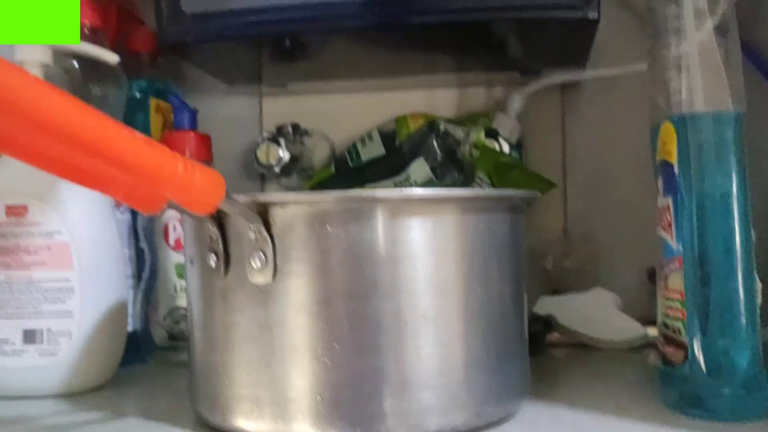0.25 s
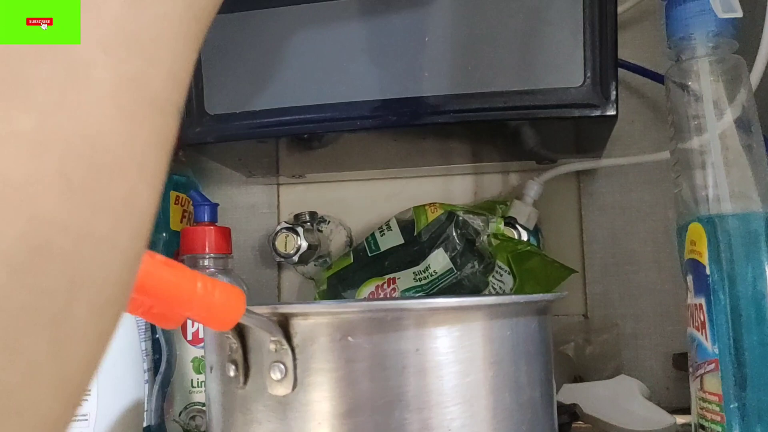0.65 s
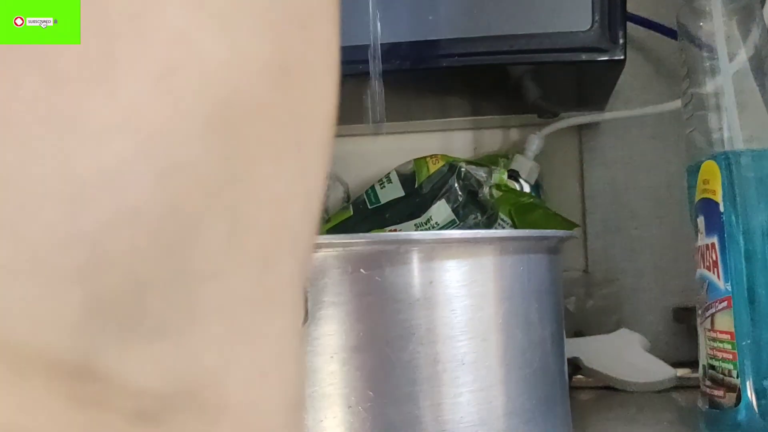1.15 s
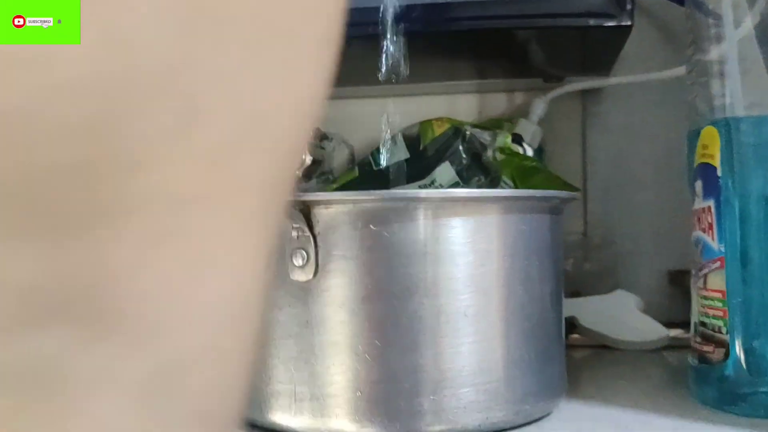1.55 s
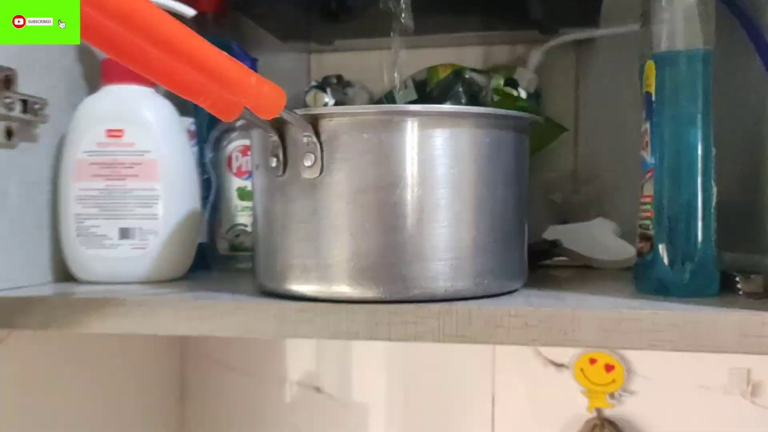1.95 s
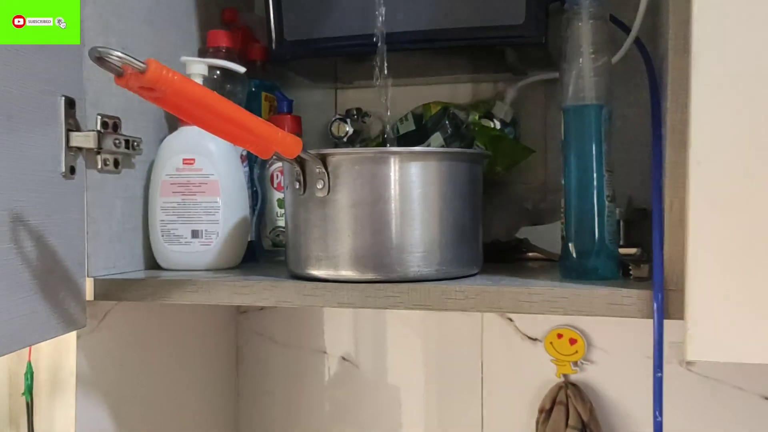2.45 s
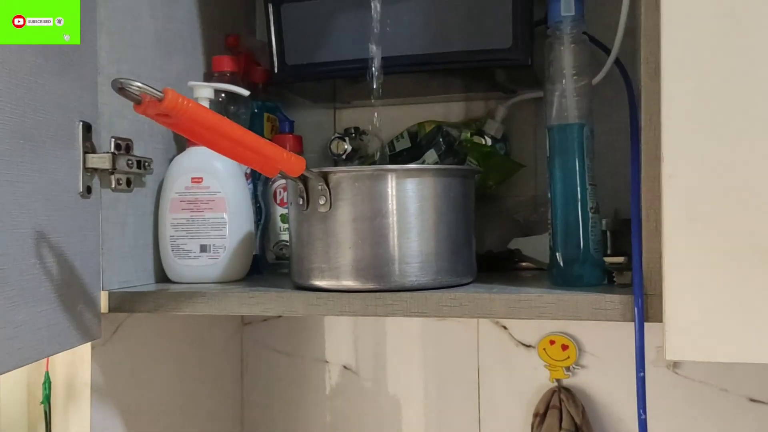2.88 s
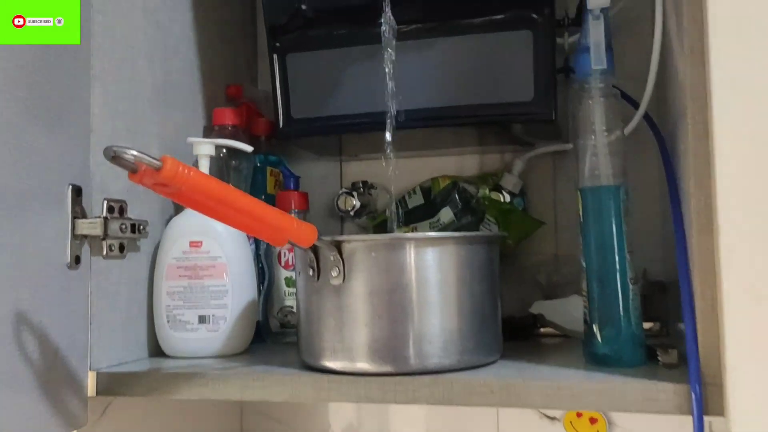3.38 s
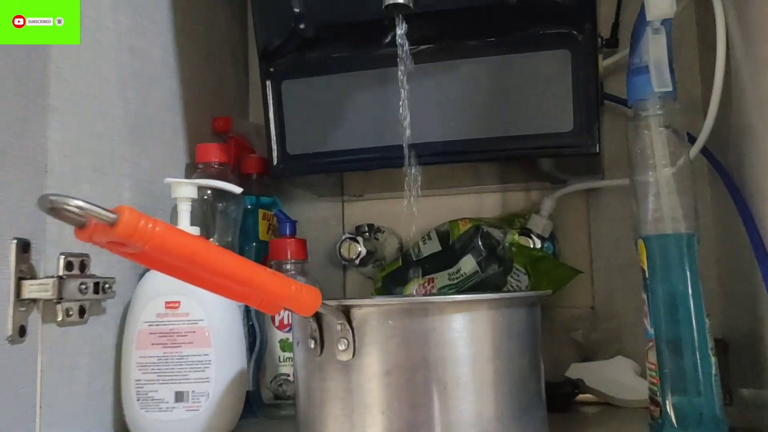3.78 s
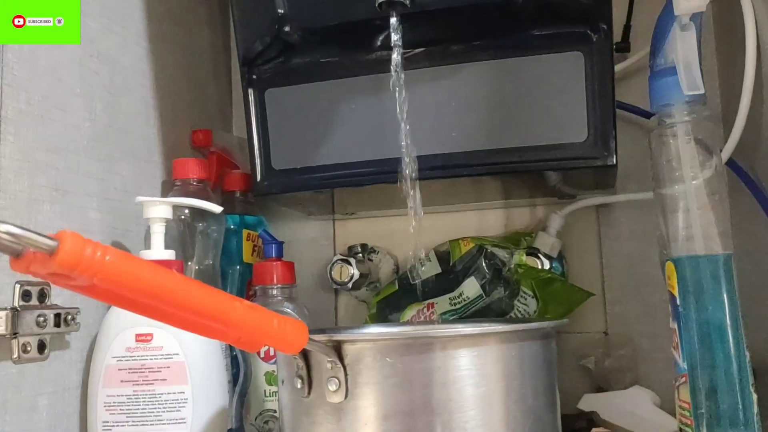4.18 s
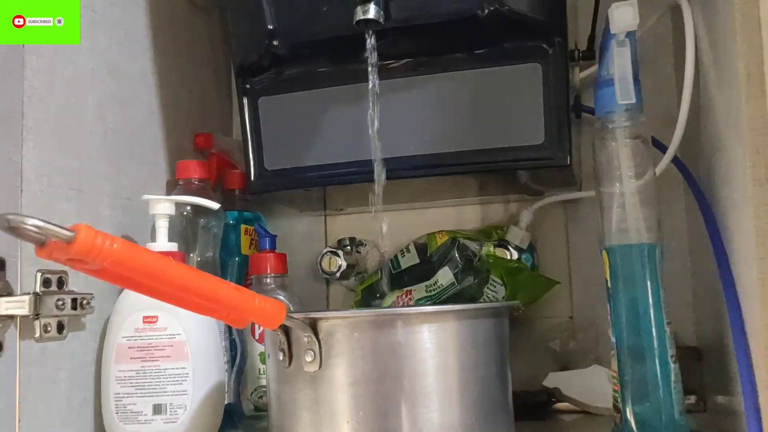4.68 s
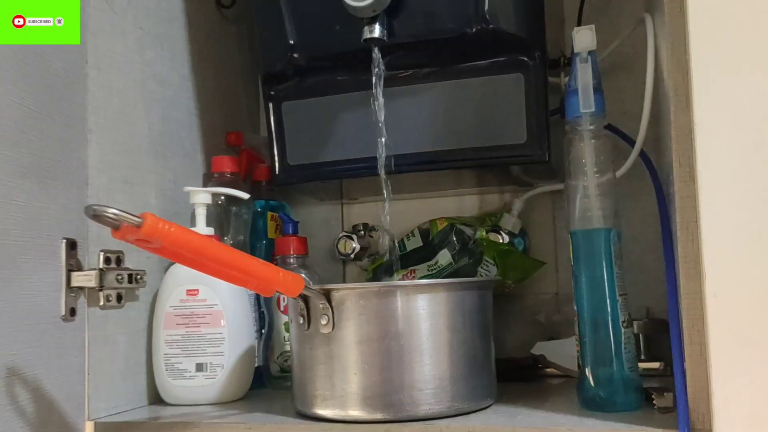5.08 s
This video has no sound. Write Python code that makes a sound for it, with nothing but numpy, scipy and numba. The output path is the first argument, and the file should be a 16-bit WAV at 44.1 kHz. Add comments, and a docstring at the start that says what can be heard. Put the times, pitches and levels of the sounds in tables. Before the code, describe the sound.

A metal pot is bumped into place on a cupboard shelf with several dull knocks and small rattles. A thin stream of water then starts pattering into it, with bright little plinks. Air briefly thumps the close microphone. In the second half, short rasping swishes, each led by a tick, repeat about three times a second on the left. A low kitchen hum and rumble continue underneath.

```python
"""A metal pot is knocked into place on a cupboard shelf; each impact excites damped modes of both.
At 1.3 s a thin stream from a purifier spout starts to patter into it: drops slap the water and trap
bubbles, which plink and ring on in the pot and cupboard. Near 2 s moving air buffets the microphone.
From 2.8 s, close on the left, ticks that were sparse come with short rasping swishes, three a second.
A low hum and rumble fill the kitchen throughout."""
import sys
import numpy as np
from scipy import signal
from scipy.fft import rfft, irfft
from scipy.io import wavfile
from numba import njit

SR = 44100
rng = np.random.default_rng(int(sys.argv[2]) if len(sys.argv) > 2 else 0)


def pcm_store(signal):
    """Save signal as 16-bit PCM."""
    levels = np.round(np.clip(np.atleast_2d(signal), -1, 1) * 32767)
    wavfile.write(sys.argv[1], SR, levels.astype(np.int16).T)


N = 235185
TIME, FREQUENCY = np.arange(N) / SR, np.fft.rfftfreq(N, 1 / SR)
OPEN_S, FLOW_RISE_S, SPRAY_RISE_S = 1.345, 0.14, 0.27   # the spout opens, flow builds, spray follows


# modes of the air in the pot: f/Hz, bandwidth/Hz, level/dB
AIR_MODES = [(590, 82, 8.5), (777, 89, 0.5), (1445, 125, 5.5), (1940, 64, -14), (2540, 77, -18),
             (5050, 110, -3), (5626, 88, 0)]
def water():
    """Cavity resonance: the pot's air column colours the stream; larger drops plink above it."""
    patter = stream()
    pot = patter + sum(from_db(db) * resonance(patter, hz, width) for hz, width, db in AIR_MODES)
    large = plinks()
    direct = placed(from_db(-4.5) * pot + from_db(-1.5) * large, pan_db=4.5, scatter_db=3.5)
    reflected = room(from_db(-2.37) * pot + from_db(2) * large, pan_db=2, build_s=0.0026)
    # the left port faces the pot, so it catches more of the treble
    lean_db = at_hz([(700, -3.5), (1100, -2.5), (1900, 5), (5000, 2), (9000, 6.5), (15000, -1.5)],
                    FREQUENCY)
    return irfft(rfft(direct + reflected) * from_db([lean_db / 2, -lean_db / 2]), N)


# spectra of the dull splash and the bright spray: f/Hz, level/dB
SPLASH_SPECTRUM = [(200, -2.5), (480, -1.5), (620, -2), (1100, 3), (1500, -5.5), (2000, 5), (3200, 0.5),
                   (4500, -3.5), (7000, -11), (16000, -41)]
SPRAY_SPECTRUM = [(1500, -12.5), (3200, -10), (4200, 4), (5500, -9.5), (6500, -2), (9300, 6.5),
                  (11500, -0.5), (14000, -5), (16000, -11)]
# path of the microphone, away from the pot and back: t/s, distance/m
MIC_PATH = [(1.6, 0.33), (2.3, 0.49), (2.72, 1), (3.0, 0.7), (3.42, 0.89), (3.8, 0.37), (4.1, 0.81),
            (4.75, 0.35), (5.3, 0.36)]
def stream(near_m=0.4, cover_s=1, spray_db_per_s=0.5):
    """Shot noise: many small impacts sum to splash and spray; the spray falls off inversely with range."""
    age = np.maximum(TIME - OPEN_S, 0)
    spreading_db = 20 * np.log10(near_m / np.interp(TIME, *np.transpose(MIC_PATH)))
    drumming_db = 7.5 * np.exp(-age / cover_s)   # the bare metal bottom is louder until covered
    # the splash fills the cupboard, so distance matters little; deeper water throws more spray
    splash_db = -57.5 + drumming_db + 0.13 * spreading_db + 3.5 * drift(rate=31)
    spray_db = -46 + spray_db_per_s * age + spreading_db + 2.5 * drift(rate=25)
    flow = 1 - np.exp(-age / FLOW_RISE_S)
    wetted = 1 - np.exp(-(age / SPRAY_RISE_S) ** 2)
    splash = coloured(grains(per_s=980, spread_db=4.5), SPLASH_SPECTRUM)
    patter = coloured(grains(per_s=1500, spread_db=3), SPRAY_SPECTRUM)
    spray = rms_one(patter + from_db(-1) * droplets())
    return flow * from_db(splash_db) * splash + wetted * from_db(spray_db) * spray


# the largest drops: t/s, level/dB, f/Hz, relative slap level/dB
LARGE_DROPS = [(1.478, -26, 8700, 5), (1.651, -18, 4900, -1), (1.655, -17.5, 10180, -14),
               (1.914, -30, 4420, 5), (1.992, -29, 12700, 8.5), (2.06, -25.5, 6150, 1),
               (2.152, -25, 10100, 2.5), (2.386, -19, 8720, -9.5), (2.452, -27, 3930, 2),
               (2.502, -28.5, 5820, 3.5), (2.554, -25.5, 10630, -7), (2.795, -28.5, 8150, -12),
               (3.047, -32, 4900, -12), (3.099, -47.5, 7260, 12.5), (3.499, -38.5, 7800, 10.5),
               (3.650, -21.5, 9260, -4), (3.866, -26.5, 5890, -2), (4.124, -36, 4900, 5),
               (4.410, -27, 10400, -4), (4.468, -25.5, 5560, -12), (4.611, -31, 8100, 3),
               (4.767, -23.5, 5470, 1.5), (5.028, -22.5, 9640, -7.5), (5.282, -32, 5460, -7)]
def plinks(strays=14):
    """Discrete transients: the largest drops, and middling ones at uneven gaps once the flow is up."""
    out = np.zeros(N)
    for s, db, hz, slap_db in LARGE_DROPS:
        add(out, s, from_db(db) * drop(hz, slap_db))
    full_s = OPEN_S + SPRAY_RISE_S
    gap_s = (N / SR - full_s) / strays
    for k, (when, softness, tone) in enumerate(rng.random((strays, 3))):
        stray = from_db(-35 - 2.5 * softness) * drop(6000 * 2 ** tone, slap_db=4.5)
        add(out, full_s + (k + when) * gap_s, stray)
    return out


def droplets(count=220):
    """Incoherent superposition of small drops, random in time, level and pitch; rms 1."""
    out = np.zeros(N)
    for when, softness, tone in rng.random((count, 3)):
        add(out, when * (N - 1) / SR, from_db(-12 * softness) * drop(4200 * 3 ** tone, slap_db=-3))
    return rms_one(out)


def drop(hz, slap_db, bubbles=4):
    """Bubble resonance: a drop slaps the water and traps bubbles that ring briefly, rising in pitch."""
    t = TIME[:SR // 25]
    age = np.maximum(t - rng.uniform(0, .004, (bubbles, 1)), 0)
    rise = 1 + .12 * (.4 - np.exp(-age / .002))
    pitch = hz * np.exp(.055 * rng.standard_normal((bubbles, 1))) * rise
    phase = 2 * np.pi * np.cumsum(pitch * (age > 0), axis=1) / SR
    cluster = np.sum(np.sin(phase) * np.exp(-age / .0016) * (1 - np.exp(-age / .0003)), axis=0)
    puff = rng.standard_normal(len(t)) * np.exp(-t / 0.0033)
    slap = band(puff, hz / 1.53, hz * 1.44) + from_db(-3.5) * band(puff, 1500, 11300)
    return from_db(-5) * peak_one(cluster) + from_db(slap_db) * peak_one(slap)


# pot and hand bump the shelf: t/s, thud level/dB, clonk level/dB, rattle level/dB, rattle f/Hz,
# click level/dB
IMPACTS = [(0.002, -44, -29, -64, 2330, -36.5), (0.052, -26.5, -27.5, -51, 1730, -39.5),
           (0.435, -27.5, -39.5, -44, 1980, -66), (0.435, -65, -60, -46.5, 8140, -68),
           (0.575, -54, -74, -40, 8850, -39), (0.839, -48, -47, -37.5, 1900, -45),
           (0.848, -42, -47.5, -40, 4240, -47), (0.889, -39, -53, -47.5, 4300, -55),
           (0.984, -31.5, -35.5, -41, 2160, -40), (1.133, -39, -42, -40, 2380, -33.5),
           (1.349, -57, -54, -60, 2130, -45.5)]
# modes of the shelf and of the pot's base: f/Hz, level/dB, T60/s
SHELF_MODES = [(145, -3, 0.084), (198, 1.5, 0.11), (224, 2, 0.14), (261, -0.5, 0.099), (301, -4, 0.095),
               (347, -8, 0.14), (396, -3, 0.11)]
BASE_MODES = [(333, -4, 0.076), (437, -4, 0.064), (500, -3.5, 0.14), (576, -6, 0.077), (635, -7, 0.061),
              (734, -6, 0.054), (966, -4.5, 0.055), (1185, -12.5, 0.056)]
def knocks(rock_s=0.011):
    """Impact excitation: the shelf thuds, the pot clonks and rocks into a second contact, parts rattle."""
    out = np.zeros(N)
    for s, thud_db, clonk_db, rattle_db, hz, click_db in IMPACTS:
        for delay, db in [(0, -1.5), (rock_s, -2)]:
            thud = from_db(db + thud_db) * struck(SHELF_MODES, uneven_db=5)
            clonk = from_db(db + clonk_db) * struck(BASE_MODES, uneven_db=0.5)
            add(out, s + delay, thud + clonk)
        add(out, s, from_db(rattle_db) * peak_one(band(burst(t60=0.12), hz / 1.204, hz * 1.17)))
        add(out, s, from_db(click_db) * peak_one(band(burst(t60=0.1), 800, 8200, order=1)))
    return placed(out, pan_db=0, scatter_db=-12) + from_db(-2) * room(out, pan_db=0, build_s=.005)


def struck(modes, uneven_db):
    """Modal superposition: grip and contact point vary each damped mode's strength and pitch."""
    t, out = TIME[:SR // 2], 0
    for hz, db, t60 in modes:
        pitch = hz * (1 + .025 * rng.standard_normal())
        amplitude = from_db(db + uneven_db * rng.standard_normal()) * rng.choice([-1, 1])
        out = out + amplitude * np.sin(2 * np.pi * pitch * t) * dying(t60)
    return peak_one(out)


# swishes: t/s at full strength, hold/s, swell time/s, level/dB, final resonance f/Hz
SWISH_EVENTS = [(2.88, 0.0056, 0.025, -25, 2670), (3.241, 0.019, 0.01, -23.5, 2450),
                (3.589, 0.019, 0.012, -22, 2770), (3.945, 0.027, 0.019, -21.5, 2740),
                (4.268, 0.027, 0.01, -20.5, 2230), (4.575, 0.018, 0.011, -25.5, 2470),
                (4.879, 0.022, 0.0088, -21, 2190), (5.192, 0.032, 0.0088, -21, 2360)]
# spectrum of their hiss: f/Hz, level/dB
HISS_SPECTRUM = [(1200, -25), (2200, -10), (3000, -10), (3750, 6.5), (4400, 3.5), (4950, -3.5), (6200, -1),
                 (7200, -2), (8100, 2.5), (8900, -3.5), (10500, -2.5), (13000, -8), (16000, -18)]
def swishes():
    """Source and filter: gritty hiss swells and stops short as its lowest resonance falls and grows."""
    level, body_share, pitch = np.zeros(N), np.zeros(N), np.full(N, 3000.)
    for s, hold, swell, db, final_hz in SWISH_EVENTS:
        to_end = s + hold - TIME
        envelope = np.exp(np.minimum(TIME - s, 0) / swell + np.minimum(to_end, 0) / 0.0069)
        level += from_db(db) * envelope * (TIME > s - .03)
        near = np.abs(to_end) < .15
        glide_left = np.clip(to_end[near] / 0.032, 0, 1)
        pitch[near] = final_hz * (1 + 0.62 * glide_left)
        body_share[near] = from_db(-16 * glide_left)
    rasp = rms_one(grains(per_s=4000, spread_db=2.5) + rng.standard_normal(N))
    sliding = gliding_resonance(rasp, pitch * (1 + 0.069 * drift(rate=180)), width_hz=300.0)
    sliding = rms_one(band(sliding, 2060, 3760, order=3))
    # narrow rings flare up by turns, so that no two swishes are alike
    rings = rms_one(sum(from_db(5 * drift(rate=50)) * resonance(rng.standard_normal(N), hz, 140)
                        for hz in np.geomspace(2400, 4400, 8)))
    body = from_db(-5.5) * sliding + from_db(-4.5) * band(rings, 1980, 7200, order=3)
    return level * (from_db(-2) * coloured(rasp, HISS_SPECTRUM) + body_share * body)


# close dry snaps: t/s, level/dB, f/Hz
SNAPS = [(0.1159, -36, 3810), (0.172, -41, 5700), (0.7164, -37.5, 4710), (0.832, -30.5, 2670),
         (2.8388, -30, 4140), (3.204, -24, 4000), (3.217, -26, 4170), (3.5465, -22, 3980),
         (4.2375, -21, 4370), (4.534, -29.5, 4420), (4.8475, -29, 4070), (5.164, -19, 4400)]
def ticks():
    """Heavy damping: each tiny snap excites one short resonance."""
    out = np.zeros(N)
    for s, db, hz in SNAPS:
        snap = burst(t60=0.0064)
        tick = band(snap, hz / 1.17, hz * 1.12) + from_db(-10.5) * band(snap, hz * 0.33, hz * 1.39)
        add(out, s, from_db(db) * peak_one(tick))
    return out


# air pushed by arm and hand: t/s, level/dB, rise and fall time/s
GUSTS = [(1.819, -29.5, 0.05), (1.996, -15.5, 0.029), (4.63, -42.5, 0.068)]
def buffets():
    """Turbulent pressure: moving air strikes each microphone port independently, the right harder."""
    spectrum = [(4, -22), (12, 13.5), (25, -3), (60, -18), (150, -19.5), (400, -50), (2000, -88)]
    push = sum(from_db(db) * np.exp(-np.abs(TIME - s) / fade_s) for s, db, fade_s in GUSTS)
    return push * coloured(rng.standard_normal((2, N)), spectrum) * from_db([[-4], [2]])


# partials of the kitchen hum: f/Hz, level/dB
HUM_PARTIALS = [(75.4, -55), (118.4, -59.5), (188.4, -64.5), (253.0, -67)]
def hum():
    """Random modulation of amplitude and phase makes low tones waver."""
    phases = [drift(rate=14) for _ in HUM_PARTIALS]
    return sum(from_db(db + 3.05 * drift(rate=9.7)) * np.sqrt(2) * np.sin(2 * np.pi * hz * TIME + phase)
               for (hz, db), phase in zip(HUM_PARTIALS, phases))


# spectrum of the kitchen rumble: f/Hz, level/dB
RUMBLE_SPECTRUM = [(20, -1.5), (28, 6), (37, -19), (48, -5.5), (70, -24), (100, -11), (145, -7),
                   (200, -13.5), (300, -17.5), (500, -27.5), (1000, -32.5), (3000, -36.5), (8000, -41.5),
                   (12000, -42), (16000, -52)]
# likeness of its left and right sides: f/Hz, correlation
RUMBLE_CORRELATION = [(30, 0.85), (70, 0.93), (140, 0.93), (300, 1), (700, 0.37), (2000, 0.033)]
def rumble():
    """Spatial coherence: the kitchen's noise is alike on both sides in the bass, unlike in the treble."""
    alike = at_hz(RUMBLE_CORRELATION, FREQUENCY)
    mid, side = rfft(rng.standard_normal((2, N)))
    air = irfft(np.sqrt(1 + alike) * mid + np.sqrt(1 - alike) * side * [[1], [-1]], N)
    return from_db(-48.5) * coloured(air, RUMBLE_SPECTRUM)


# reverberation time of cupboard and kitchen: f/Hz, T60/s
REVERB_TIMES = [(150, 0.26), (600, 0.43), (2000, 0.32), (8000, 0.33), (16000, 0.2)]
def room(x, pan_db, build_s):
    """Reverberation: dense reflections, different at each side, build up and die band by band."""
    edges = np.geomspace(60, 18000, 9)
    white = rng.standard_normal((2, SR // 2))
    tail = sum(band(white, low, high) * dying(at_hz(REVERB_TIMES, np.sqrt(low * high)))
               for low, high in zip(edges, edges[1:]))
    onset = 1 - np.exp(-TIME[:SR // 2] / build_s)
    return convolved(x, tail * onset) * from_db([[pan_db / 2], [-pan_db / 2]])


def placed(x, pan_db, scatter_db):
    """Time and level difference: the left port lags one sample; near surfaces scatter equally to both."""
    scatter = rng.standard_normal((2, SR // 2)) * dying(t60=.05)
    direct = np.array([np.append(0, x[:-1]), x]) * from_db([[pan_db / 2], [-pan_db / 2]])
    return direct + from_db(scatter_db) * convolved(x, scatter)


def convolved(x, response):
    """Convolution with a stereo impulse response scaled to unit energy."""
    response = response / np.sqrt(np.sum(response ** 2, axis=1, keepdims=True))
    return signal.fftconvolve(x[None], response, axes=1)[:, :N]


def from_db(db):
    """Level to amplitude ratio."""
    return 10 ** (np.asarray(db) / 20)


def rms_one(x):
    """Normalisation to unit rms."""
    return x / np.sqrt(np.mean(x ** 2) + 1e-20)


def peak_one(x):
    """Normalisation to unit peak."""
    return x / np.abs(x).max()


def at_hz(points, hz):
    """Interpolation on a log-frequency axis."""
    f, value = np.transpose(points)
    return np.interp(np.log(np.maximum(hz, 1)), np.log(f), value)


def coloured(x, spectrum):
    """Spectral shaping by rows of f/Hz, level/dB; rms 1."""
    return rms_one(irfft(rfft(x) * from_db(at_hz(spectrum, FREQUENCY)), N))


def band(x, low_hz, high_hz, order=2):
    """Causal band-pass filtering."""
    edges = [low_hz, min(high_hz, SR / 2 - 1000)]
    return signal.sosfilt(signal.butter(order, edges, "band", fs=SR, output="sos"), x)


def resonance(x, hz, width_hz):
    """Two-pole resonance with unit peak gain."""
    r = np.exp(-np.pi * width_hz / SR)
    feedback = [1, -2 * r * np.cos(2 * np.pi * hz / SR), r * r]
    return signal.lfilter(np.array([1, 0, -1]) * (1 - r * r) / 2, feedback, x)


@njit
def gliding_resonance(x, hz, width_hz):
    """Two-pole resonance with a moving centre."""
    y, r = np.zeros(len(x)), np.exp(-np.pi * width_hz / SR)
    for i in range(2, len(x)):
        drive = (1 - r * r) / 2 * (x[i] - x[i - 2])
        y[i] = drive + 2 * r * np.cos(2 * np.pi * hz[i] / SR) * y[i - 1] - r * r * y[i - 2]
    return y


def drift(rate):
    """Random fluctuation through `rate` values a second; rms 1."""
    return rms_one(np.interp(TIME * rate, np.arange(N), rng.standard_normal(N)))


def grains(per_s, spread_db):
    """Shot noise: random clicks of uneven size; rms 1."""
    sizes = from_db(spread_db * np.minimum(rng.exponential(1, N), 4)) * rng.choice([-1, 1], N)
    return rms_one(sizes * (rng.random(N) < per_s / SR))


def dying(t60):
    """Exponential decay, half a second long."""
    return from_db(-60 * TIME[:SR // 2] / t60)


def burst(t60):
    """Exponentially damped noise."""
    return dying(t60) * rng.standard_normal(SR // 2)


def add(track, s, sound):
    """Superposition of a sound on a track at time s."""
    start = max(round(s * SR), 0)
    track[start:start + len(sound)] += sound[:N - start]


def scene():
    """Superposition of the pot in its cupboard, the close sounds on the left and the kitchen."""
    close = swishes() + ticks()
    pot = knocks() + water()
    direct = from_db(-3) * placed(close, pan_db=15, scatter_db=-5.5)
    reflected = from_db(-14) * room(close, pan_db=7, build_s=0.0048)
    return pot + direct + reflected + rumble() + hum() + buffets()


def record(dry, cutoff_hz=16000):
    """Band limiting: a steep low-pass cuts the highest treble."""
    return signal.sosfilt(signal.ellip(10, .1, 80, cutoff_hz, fs=SR, output="sos"), dry)


dry = scene()
out = record(dry)
pcm_store(out)
```